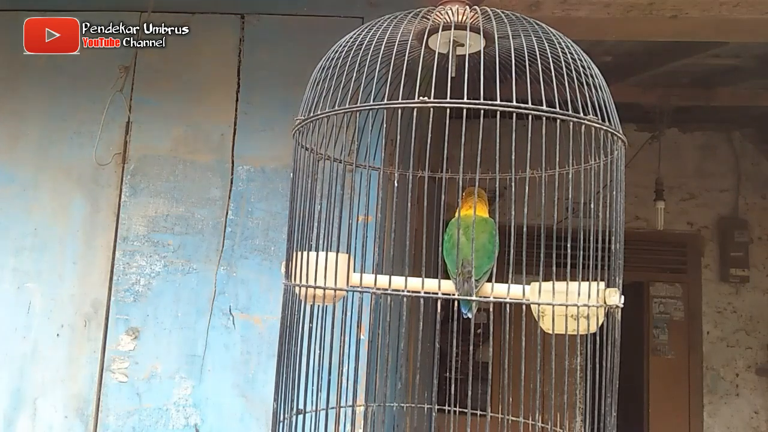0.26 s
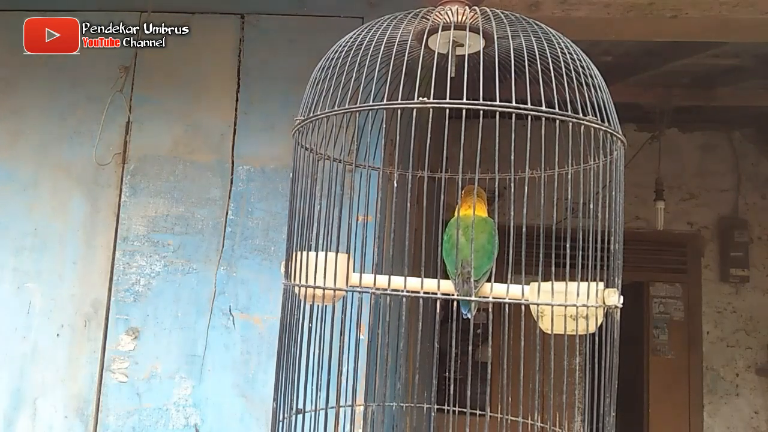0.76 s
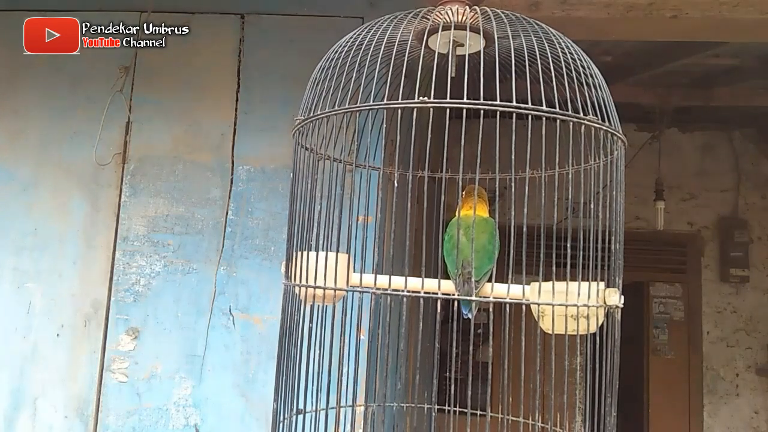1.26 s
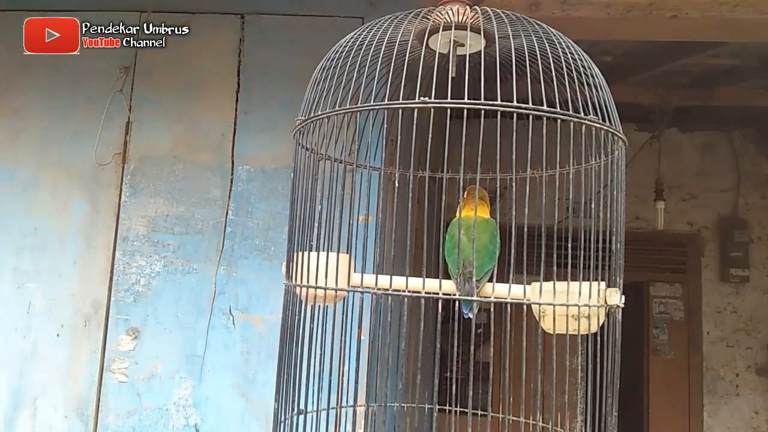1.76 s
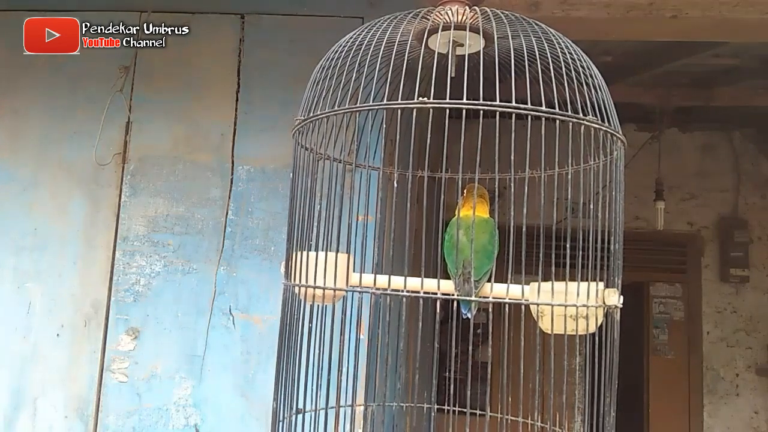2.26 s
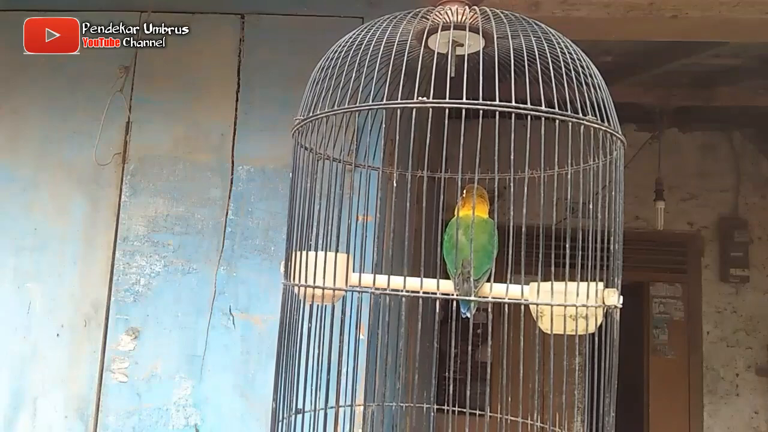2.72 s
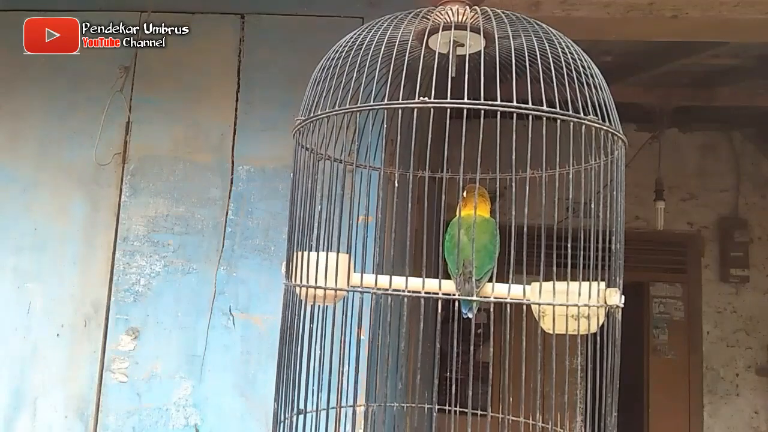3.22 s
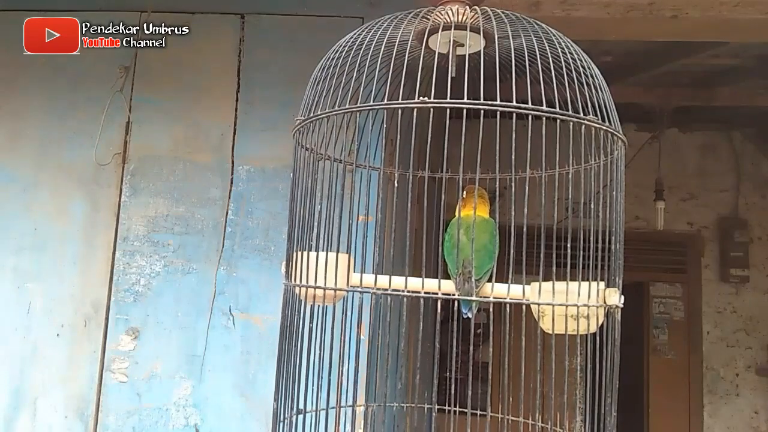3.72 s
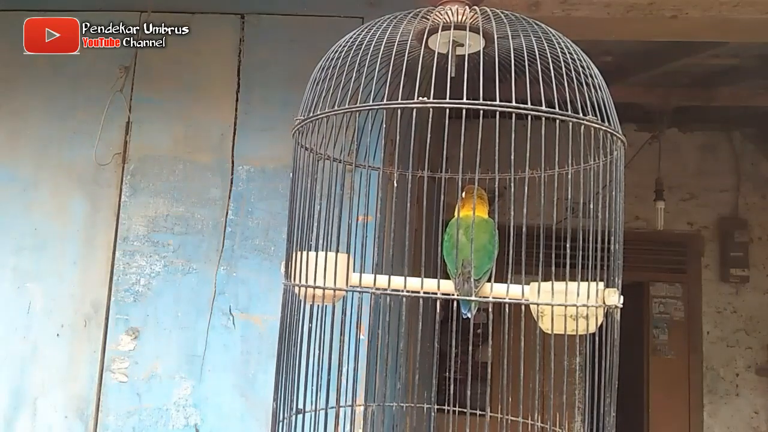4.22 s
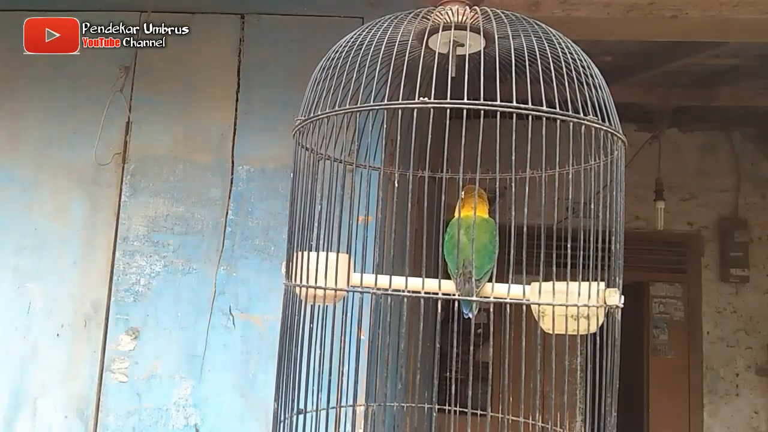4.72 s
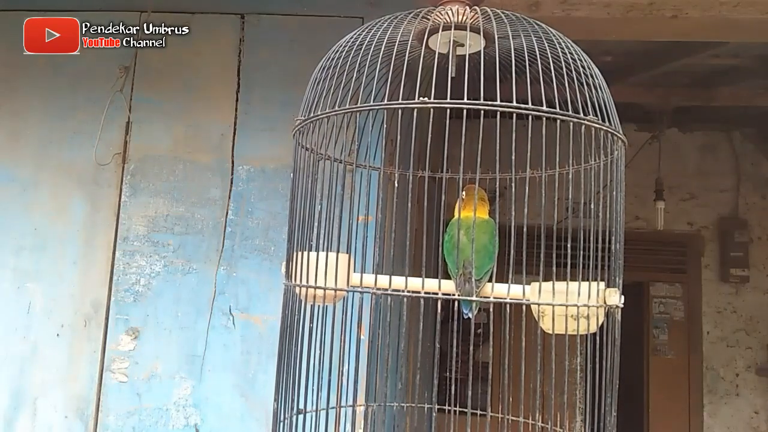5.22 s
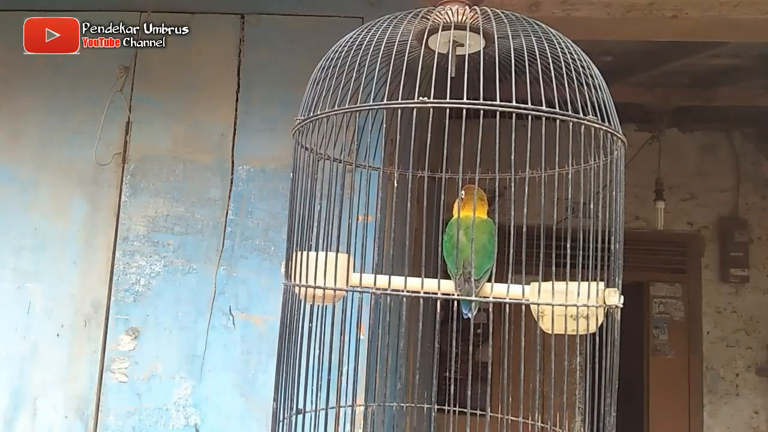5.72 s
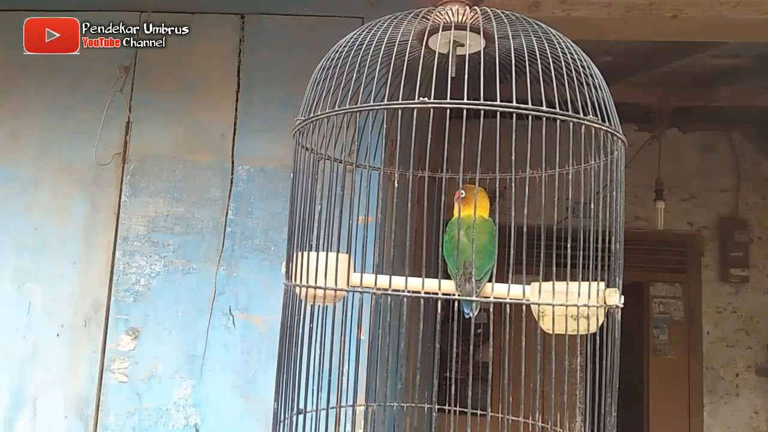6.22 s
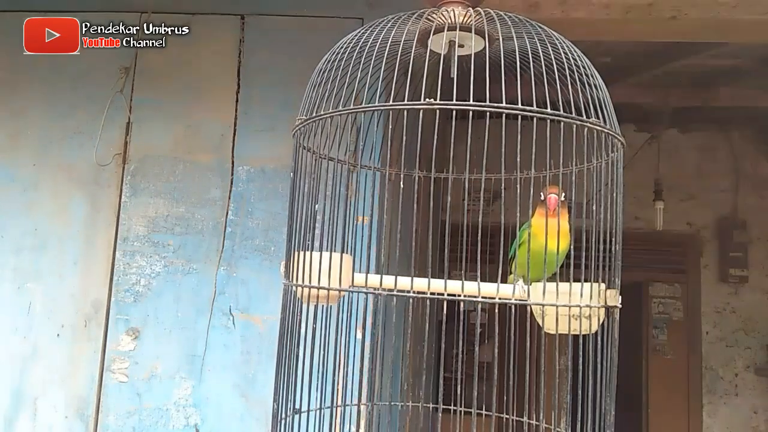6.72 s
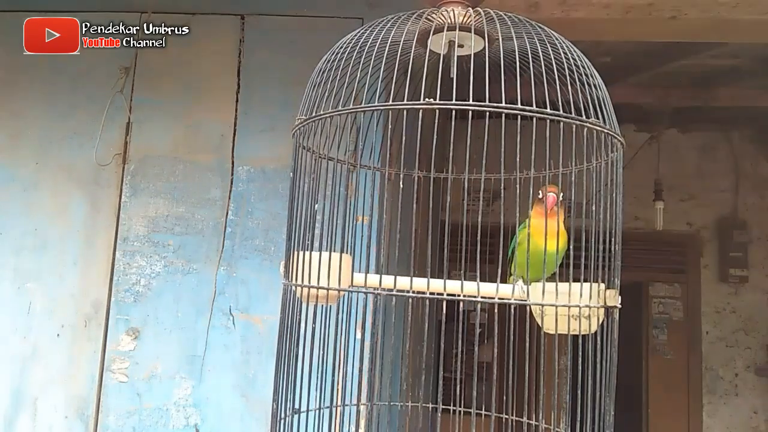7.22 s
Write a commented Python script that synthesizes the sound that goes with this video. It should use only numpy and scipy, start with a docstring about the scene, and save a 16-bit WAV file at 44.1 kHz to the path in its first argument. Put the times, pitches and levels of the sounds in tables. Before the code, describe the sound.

A lovebird close by on an echoing porch sings almost without pause: steady tweets, harsher rasps, short pips, a fast ticking trill, then slurred squeaky notes. Behind it a single-cylinder motorbike falls from a throaty burr to a slow, fading putter, with traffic wash, hiss and a few dull thuds. Near the end the background drops away, and one clear chirp sounds alone.

```python
"""In the street a single-cylinder motorbike, pulses and gas puffs ringing a pipe, drops from high revs
to an idle amid noise for traffic and hiss. On a porch a lovebird in a cage, a gliding tone that shakes and
doubles its period, trills tweets, and under them a thin whistle sinks farther off.
Rasps, pips, thin squeaks, a fast trill of ticks and slurred notes come next, with a few dull thuds, rung
noise, among them. Near the end the firings stop and the background falls away, leaving one last chirp."""
import sys
import numpy as np
from scipy import signal
from scipy.fft import rfft, irfft
from scipy.io import wavfile
from scipy.ndimage import uniform_filter1d

SR = 44100
rng = np.random.default_rng(int(sys.argv[2]) if len(sys.argv) > 2 else 0)


def wrap_up_sound(samples):
    """Save the sound to the file named by the first command line argument, as 16-bit audio."""
    columns = np.atleast_2d(samples).T
    # keep every value between -1 and 1, then stretch to whole-number steps
    tamed = np.clip(columns, -1, 1)
    steps = np.round(tamed * 32767).astype(np.int16)
    wavfile.write(sys.argv[1], SR, steps)


N = 329427
TIME = np.arange(N) / SR


def from_db(db):
    """Decibels to amplitude gain."""
    return 10 ** (np.asarray(db) / 20)


def rms_one(x):
    """Scale to unit power."""
    return x / np.sqrt(np.mean(x ** 2) + 1e-20)


def read(rows, t):
    """Every column of a curve, joined by straight lines, at the times t."""
    s, *columns = np.transpose(rows)
    return [np.interp(t, s, column) for column in columns]


def gain_at(spectrum, hz):
    """Gain of a spectrum, joined on a log-frequency axis."""
    point_hz, point_db = np.transpose(spectrum)
    return from_db(np.interp(np.log(hz + 1e-9), np.log(point_hz), point_db))


def coloured(spectrum):
    """Steady unit-power noise shaped by a spectrum."""
    bins = rfft(rng.standard_normal(N))
    return rms_one(irfft(bins * gain_at(spectrum, np.fft.rfftfreq(N, 1 / SR)), N))


def flutter(size, hz):
    """Random wavering, mostly slower than hz, with unit power."""
    sos = signal.butter(2, hz, fs=SR, output="sos")
    warm_up = SR // 10
    return rms_one(signal.sosfilt(sos, rng.standard_normal(size + warm_up))[-size:])


def resonate(x, modes):
    """Parallel two-pole resonances with alternating signs."""
    out = 0
    for k, (hz, width_hz, db) in enumerate(modes):
        r = np.exp(-np.pi * width_hz / SR)
        poles = [1, -2 * r * np.cos(2 * np.pi * hz / SR), r * r]
        peak = (1 - r * r) / 2  # evens out the gain at resonance
        out = out + (-1) ** k * from_db(db) * peak * signal.lfilter([1, 0, -1], poles, x)
    return out


def add(track, start_s, sound):
    """Mix a sound into a track, dropping whatever falls outside it."""
    at = round(start_s * SR) + np.arange(len(sound))
    inside = (at >= 0) & (at < N)
    track[at[inside]] += sound[inside]


def exhaust(firings, modes, level_db, gas_db, puff_s, uneven_db=2, steady=.002):
    """Each firing is a pressure pulse and a puff of gas that ring the pipe; without them a smooth hum stays."""
    pulses = np.zeros(N)
    pulses[firings] = from_db(uneven_db * rng.standard_normal(len(firings)))
    fade = np.exp(-1 / (puff_s * SR))
    flow = signal.lfilter([1], [1, -fade], pulses) * np.sqrt(1 - fade ** 2) + steady
    gas = from_db(gas_db) * flow * rng.standard_normal(N)
    sound = resonate(pulses + gas, modes)
    # slow levelling, so that the level curve sets the loudness
    power = uniform_filter1d(uniform_filter1d(sound ** 2, size=8000), size=4000)
    return from_db(level_db) * sound / np.sqrt(np.abs(power) + 1e-20)


# Engine speed. Each row: time in seconds, rate in firings per second.
ENGINE_SPEED = [(0, 31), (.6, 29), (1.05, 27), (1.6, 25.3), (2.3, 24.3), (3.2, 24), (3.8, 21), (4.3, 13),
                (4.52, 11.05), (7.47, 11)]
# Pipe resonances: deep thump, silencer, and bark at high revs.
# Each row: centre in Hz, width in Hz, relative level in dB.
THUMP_MODES = [(65, 25, -2), (107, 23.4, 4.5), (140.6, 8.4, 1.5)]
SILENCER_MODES = [(162.2, 6.7, 5), (232.6, 45.4, -8.5), (305, 19, -9.5), (435.3, 18, -13.5),
                  (990, 250, -34)]
BARK_MODES = [(272.9, 13, 0)]
# Thump level, following the engine's load. Each row: time in seconds, level in dB before a trim.
THUMP_CURVE = [(0.0, -30), (0.06, -34.5), (0.37, -34.5), (0.77, -20.5), (1.41, -28), (1.89, -41.5),
               (6.62, -48), (6.66, -57.5), (7.43, -63.5), (7.47, -78)]
# Level of the silencer's ring. Each row: time in seconds, level in dB before a trim.
RING_CURVE = [(0.0, -32), (0.6, -33), (1.27, -37), (1.52, -44), (2.93, -52), (3.2, -50), (3.39, -37),
              (4.2, -49.5), (4.35, -37.5), (5.03, -58), (5.78, -45), (6.76, -60.5), (7.07, -56),
              (7.47, -66.5)]


def motorbike(thump_trim_db=0.5, ring_trim_db=-1.0, bark_trim_db=2.5, bark_db_per_firing=3.04):
    """One cylinder, slowing to an idle; its firings ring the pipe, and the bark sinks with the revs."""
    count_from_s, last_firing_s = 3.8, 6.65
    per_s, = read(ENGINE_SPEED, TIME)
    cycles = np.cumsum(per_s) / SR
    # the count is aligned to a moment in the slowing
    cycles = cycles - np.interp(count_from_s, TIME, cycles)
    firings = np.flatnonzero(np.diff(np.floor(cycles)))
    firings = firings[firings < last_firing_s * SR]
    thump_db, = read(THUMP_CURVE, TIME)
    ring_db, = read(RING_CURVE, TIME)
    bark_db = ring_db + bark_trim_db + bark_db_per_firing * (per_s - per_s[0])
    thump = exhaust(firings, THUMP_MODES, thump_db + thump_trim_db, gas_db=-8, puff_s=0.052)
    ring = exhaust(firings, SILENCER_MODES, ring_db + ring_trim_db, gas_db=4, puff_s=0.18)
    bark = exhaust(firings, BARK_MODES, bark_db, gas_db=-8, puff_s=.05)
    band = signal.butter(2, [55, 2000], "band", fs=SR, output="sos")
    return signal.sosfilt(band, thump + ring + bark)


# Lumpy midrange of the street. Each row: time in seconds, level in dB.
LUMP_CURVE = [(0, -64), (.22, -41), (.45, -52), (.73, -46), (1.1, -47), (1.7, -65.5), (7.47, -92.5)]
# Where the lumps lie: lowest centre in Hz, highest centre in Hz.
LUMP_RANGE = (850, 1600)


def lumps(width_hz=70, patchy_db=5, swell_hz=9, count=9):
    """Narrow bands of midrange noise swell and sink, each on its own."""
    total = np.zeros(N)
    for hz in np.geomspace(*LUMP_RANGE, count):
        band = resonate(rng.standard_normal(N), [(hz, width_hz, 0)])
        total += from_db(patchy_db * flutter(N, swell_hz)) * band
    sos = signal.butter(2, [600, 2200], "band", fs=SR, output="sos")
    level_db, = read(LUMP_CURVE, TIME)
    return from_db(level_db) * rms_one(signal.sosfilt(sos, total))


# Colours of the traffic wash and of the hiss. Each row: frequency in Hz, relative density in dB per Hz.
WASH_SPECTRUM = [(250, 5.5), (450, -4.5), (540, -3), (820, 6), (1100, -3), (1600, -6.5), (2000, -2),
                 (2600, -21), (4000, -25), (8000, -23.5)]
HISS_SPECTRUM = [(1500, -12), (3000, -10), (4500, -10), (5800, -10.5), (8000, 8), (10000, 2), (14000, -5.5),
                 (16000, -21)]
# Their levels. Each row: time in seconds, level in dB before the trim and the final drop.
WASH_CURVE = [(0.0, -49.5), (0.62, -45), (0.99, -48.5), (1.48, -55.5), (2.57, -55), (6.42, -54),
              (6.55, -53)]
HISS_CURVE = [(0.0, -46), (2.06, -50), (2.3, -50.5), (4.89, -59), (5.24, -54), (5.79, -53.5), (6.49, -63),
              (6.6, -76)]


def street(wash_trim_db=1.5, hiss_trim_db=-1.0, waver_db=2.3):
    """Shaped noise: a wavering wash of traffic, lumpy at first, and a thin hiss; wash and hiss drop late."""
    hush_at_s, hush_fade_s, wash_drop_db, hiss_drop_db = 6.65, 0.078, 21, 24
    hush = np.clip((TIME - hush_at_s) / hush_fade_s, 0, 1)
    wash_db = read(WASH_CURVE, TIME)[0] + wash_trim_db - wash_drop_db * hush
    hiss_db = read(HISS_CURVE, TIME)[0] + hiss_trim_db - hiss_drop_db * hush
    wash = from_db(wash_db + waver_db * flutter(N, 14)) * coloured(WASH_SPECTRUM)
    hiss = from_db(hiss_db) * coloured(HISS_SPECTRUM)
    return wash + lumps() + hiss


# Windpipe and open beak as a filter. Each row: frequency in Hz, gain in dB.
THROAT_GAIN = [(1500, 23), (2500, -16.5), (3500, 3.5), (4800, -6), (6000, 1), (7500, -5.5), (9000, -5.5),
               (11000, 1), (13000, 1), (15000, -36.5)]


def syllable(t, shape, pitch, overtone_db, slope_db=-5):
    """The syrinx glides one tone; pressed hard it shakes and doubles its period, adding half-pitch tones.

    Doubling 0 is pure, 1 has the half-pitch tones in full, above 1 the half pitch leads.
    """
    jitter, shake_hz, shimmer_db, smear_rad = .06, 700, 3.5, .8  # depths at full roughness
    hz, level_db, rough, doubling = read(shape, t)
    hz = pitch * hz * (1 + jitter * rough * flutter(len(t), shake_hz))
    phase = 2 * np.pi * np.cumsum(hz) / SR
    tone, power = 0, 0
    for half in range(1, 9):
        k = half / 2  # multiple of the pitch
        source_db = overtone_db * (half > 3) + slope_db * max(k - 2, 0)
        if half % 2 == 0:
            share = 1
        elif half == 1:
            share = doubling ** 2
        else:
            share = np.minimum(doubling, 1) ** 2
        weight = from_db(source_db) * gain_at(THROAT_GAIN, k * hz) * share * (k * hz < SR / 2)
        # chaotic vibration breaks each partial up on its own, the high ones most
        partial = np.sin(k * (phase + smear_rad * rough * flutter(len(t), shake_hz)))
        shimmer = from_db(shimmer_db * rough * (flutter(len(t), shake_hz) - rough / 2))
        tone = tone + weight * partial * shimmer
        power = power + weight ** 2 / 2
    return from_db(level_db) * tone / np.sqrt(power + 1e-12) * signal.windows.tukey(len(t), .05)


def phrase(shape, notes, overtone_db, stretch=1, longer_per_db=0):
    """One syllable repeated, each note with its own strength and pitch; strength may alter its length."""
    out = np.zeros(N)
    first, last = shape[0][0], shape[-1][0]
    mean_db = np.mean([note[1] for note in notes])
    for s, db, pitch in notes:
        length = stretch * np.exp(longer_per_db * (db - mean_db))
        t = np.arange(first, last, 1 / (SR * length))  # time within the unstretched shape
        add(out, s + first * length, from_db(db) * syllable(t, shape, pitch, overtone_db))
    return out


def plain(notes):
    """Notes at their shape's own pitch."""
    return [(s, db, 1) for s, db in notes]


def trill(first_s, gap_s, slowing_s, effort, count, uneven_db, stray):
    """Notes on a beat whose gap grows by slowing_s each time; level and pitch follow the effort, unevenly."""
    k = np.arange(count)
    s = first_s + k * gap_s + slowing_s * k * (k - 1) / 2
    db, pitch = read(effort, s)
    chance = rng.uniform(-1, 1, (count, 2))
    return np.transpose([s, db + uneven_db * chance[:, 0], pitch * (1 + stray * chance[:, 1])])


# Shape of a tweet, before the note's pitch, level and stretch, as for all syllables below.
# Each row: seconds from onset, pitch in Hz, level in dB, roughness 0-1, period doubling.
TWEET_SHAPE = [(-.016, 3900, -20, .2, 6), (-.008, 4700, -6, .35, 6), (-.003, 5800, -2, .35, 6),
               (-.001, 4400, -4, .42, .25), (.004, 4300, -1, .54, .1), (.011, 3980, 1, .5, .1),
               (.019, 3670, 2, .33, 0), (.036, 3620, 1.5, .22, 0), (.043, 3610, -16, .2, 0)]
# Effort over the trill. Each row: time in seconds, level in dB, pitch factor.
TWEET_CURVE = [(0, -31, 1), (.25, -31.5, 0.97), (.65, -30, 0.99), (1.0, -30, 1.014), (1.45, -31, .995),
               (1.75, -32.5, 0.97)]


def tweets():
    """A slowing trill of syrinx tones; stronger notes are held longer."""
    notes = trill(first_s=.0135, gap_s=.1212, slowing_s=.00036, effort=TWEET_CURVE,
                  count=15, uneven_db=.4, stray=.008)
    return phrase(TWEET_SHAPE, notes, overtone_db=-5.5, stretch=1.01, longer_per_db=0.11)


# Each row: seconds from onset, pitch in Hz, level in dB, roughness 0-1, period doubling.
WHISTLE_SHAPE = [(-.006, 2650, -25.5, 0.036, 0.0047), (.004, 2620, 9.5, 0.03, 0.015),
                 (.022, 2260, 6, .1, 0), (.036, 2240, -17.5, .1, 0.0073)]
# Each row: start in seconds, level in dB, pitch factor.
WHISTLE_NOTES = [(0.209, -45.5, 0.96), (0.353, -44, 0.93), (0.43, -46.5, 0.93), (0.634, -45, 0.9),
                 (.725, -43.5, 0.89)]


def whistles():
    """A thin, sinking whistle farther off: the same tone model with weak overtones."""
    return phrase(WHISTLE_SHAPE, WHISTLE_NOTES, overtone_db=-38, stretch=1.15)


# Dull blows in the street. Each row: start in seconds, level in dB.
THUD_BLOWS = [(1.842, -34), (1.879, -35), (3.212, -32), (3.249, -35), (3.286, -40.5), (4.242, -40),
              (4.382, -37.5)]
# Their hollow body. Each row: centre in Hz, width in Hz, relative level in dB.
THUD_MODES = [(157, 15.7, 8.5), (266, 79, -3.5), (350, 17, -5), (450, 45, -12)]


def thuds(t60_s=0.44):
    """Soft blows: decaying noise rings something hollow, drawn out by the street's echo."""
    out, t = np.zeros(N), TIME[:SR // 2]
    for s, db in THUD_BLOWS:
        boom = resonate(rng.standard_normal(len(t)) * from_db(-60 * t / t60_s), THUD_MODES)
        add(out, s, from_db(db) * boom / np.std(boom[:SR // 20]))
    return signal.sosfilt(signal.butter(2, 600, fs=SR, output="sos"), out)


# Each row: seconds from onset, pitch in Hz, level in dB, roughness 0-1, period doubling.
RASP_SHAPE = [(-.010, 4050, -17, .1, .9), (-.003, 4000, -11, .25, .9), (0, 5900, 2, .75, 1),
              (.006, 5100, 3, .62, .9), (.014, 4830, 1.5, .5, .85), (.023, 4780, 0, .45, .85),
              (.031, 4850, -14, .5, .8)]
# Each row: start in seconds, level in dB, pitch factor.
RASP_NOTES = [(1.862, -29, 1.05), (1.968, -29.5, 0.98), (2.082, -27.5, 1), (2.2, -27.5, 1),
              (2.31, -26.5, 1.05), (2.415, -28, 1.005), (2.534, -26, 1.03), (2.656, -28, 1.016),
              (2.782, -28.5, 1.1), (2.906, -28.5, 1.1)]


def rasps():
    """Rough notes whose strong period doubling fills in half-pitch tones."""
    return phrase(RASP_SHAPE, RASP_NOTES, overtone_db=-11.5, stretch=1.16)


# Each row: seconds from onset, pitch in Hz, level in dB, roughness 0-1, period doubling.
PIP_SHAPE = [(-.001, 4840, -38, 0.79, .9), (.002, 4996, 7, 0.14, 0.99), (.006, 5403, 1, 0.074, 0.96),
             (.012, 5300, -2, .15, .7), (.016, 5100, -57, .2, .7)]
# Each row: start in seconds, level in dB, pitch factor.
PIP_NOTES = [(3.022, -30.5, 1.073), (3.108, -31.5, 1), (3.203, -34, 1.005), (3.296, -39.5, 0.94),
             (3.377, -38.5, 0.98), (3.452, -37.5, .9), (3.528, -33, 1.01)]


def pips():
    """Very short period-doubled tones; stronger ones are slightly shorter."""
    return phrase(PIP_SHAPE, PIP_NOTES, overtone_db=-14.5, stretch=.87, longer_per_db=-0.0091)


# Each row: seconds from onset, pitch in Hz, level in dB, roughness 0-1, period doubling.
SQUEAK_SHAPE = [(-.003, 8940, -18, 0.42, 0.0043), (0, 10650, 8.5, 0.53, 0), (.002, 11000, -17, .3, 0),
                (.005, 8600, 9, 0.5, 0.016)]
# Each row: start in seconds, level in dB.
SQUEAK_NOTES = [(3.22, -43), (3.256, -42), (3.292, -39.5), (4.242, -44), (4.454, -48)]


def squeaks():
    """Thin, very high tones among the pips and ticks, nearly bare of overtones."""
    return phrase(SQUEAK_SHAPE, plain(SQUEAK_NOTES), overtone_db=-31)


# Each row: seconds from onset, pitch in Hz, level in dB, roughness 0-1, period doubling.
TICK_SHAPE = [(-.056, 4150, -26, .3, 5), (-.042, 4100, -14, .3, 5), (-.020, 4000, -32, .3, 5),
              (-.002, 4200, -32, .6, 2), (0, 6100, 5.5, .7, .8), (.003, 5900, 3.5, .65, .6),
              (.004, 4000, -3, .7, .3), (.008, 4400, -4, .5, .2), (.012, 4400, -20, .4, .2)]
# Effort over the fast trill. Each row: time in seconds, level in dB, pitch factor.
TICK_CURVE = [(3.66, -34.5, 0.98), (3.82, -41.5, 1.03), (4.11, -40.5, 0.98), (4.39, -33, 1.01),
              (4.5, -36.5, .98), (4.87, -40, 0.97)]
# The strong tick that closes it: start in seconds, level in dB, pitch factor.
LAST_TICK = (4.982, -29.5, 0.95)


def ticks():
    """A fast, slowing trill of rough, short bursts of tone, closed by a strong tick."""
    notes = trill(first_s=3.603, gap_s=.0714, slowing_s=.00051, effort=TICK_CURVE,
                  count=18, uneven_db=1.2, stray=.04)
    return phrase(TICK_SHAPE, [*notes, LAST_TICK], overtone_db=-11, stretch=.9)


# Each row: seconds from onset, pitch in Hz, level in dB, roughness 0-1, period doubling.
DIP_SHAPE = [(-.002, 7240, -10, .5, 1.3), (.003, 6480, 1.5, 0.65, 1.3), (.011, 4990, 1, 0.7, 0.98),
             (.02, 4410, -1, .45, .6), (.034, 4550, -1, .45, .6), (.039, 4650, -20, .4, .6)]
# Each row: start in seconds, level in dB.
DIP_NOTES = [(5.075, -29)]


def dips():
    """A falling, half-doubled tone that leads from the ticks into the slurred notes."""
    return phrase(DIP_SHAPE, plain(DIP_NOTES), overtone_db=-6.5)


# Each row: seconds from onset, pitch in Hz, level in dB, roughness 0-1, period doubling.
CHEW_SHAPE = [(-.002, 5290, -14.5, 0.15, 0.12), (.002, 5023, -2, 0.66, 0.18), (.009, 4364, -5, 0.81, 0.55),
              (.015, 4320, -0.5, 0.31, 0.51), (.023, 4750, -2.5, .3, 0.87), (.031, 5510, -2.5, 0.15, 0.96),
              (.039, 5500, -2.5, 0.41, 0.7)]
# Each row: start in seconds, level in dB, pitch factor.
CHEW_NOTES = [(5.174, -22.5, 1.004), (5.281, -23.5, 1.06)]


def chews():
    """Tones that fall and rise again while their period doubling grows."""
    return phrase(CHEW_SHAPE, CHEW_NOTES, overtone_db=-11.5)


# Each row: seconds from onset, pitch in Hz, level in dB, roughness 0-1, period doubling.
SLIDE_SHAPE = [(-.009, 3860, -6, .05, 0.047), (.002, 3546, 1.5, .08, 0.0078),
               (.012, 3285, -0.5, .15, 0.022), (.025, 2830, 5, .5, 0), (.029, 4850, -4, .3, .1),
               (.042, 4650, 9.5, .08, 0), (.048, 4200, -9, .1, 0.011)]
# Each row: start in seconds, level in dB.
SLIDE_NOTES = [(5.409, -29.5)]


def slides():
    """A nearly pure tone that slides down, then leaps up."""
    return phrase(SLIDE_SHAPE, plain(SLIDE_NOTES), overtone_db=-3, stretch=.87)


# Each row: seconds from onset, pitch in Hz, level in dB, roughness 0-1, period doubling.
SLUR_SHAPE = [(-.022, 1584, -21, 0.045, 0.0091), (-.015, 1847, -11, .1, 0.014),
              (-.008, 3055, -7.5, 0.24, 0.02), (.002, 3594, 4.5, 0.055, 0.015),
              (.013, 3240, -4, 0.66, 0.0067), (.017, 5860, 5, 0.58, .1), (.023, 4750, -4, .15, 0),
              (.030, 4553, 9.5, 0.06, 0.028), (.036, 4630, -5, .1, 0.016)]
# Each row: start in seconds, level in dB.
SLUR_NOTES = [(5.538, -29.5), (5.66, -29.5), (5.781, -30), (5.903, -28.5)]


def slurs():
    """Tones that sweep up from a low start, with a rough leap on the way."""
    return phrase(SLUR_SHAPE, plain(SLUR_NOTES), overtone_db=-8.0, stretch=0.99)


# Each row: seconds from onset, pitch in Hz, level in dB, roughness 0-1, period doubling.
WARBLE_SHAPE = [(-.033, 3170, -24, 0.12, 0), (-.018, 2865, 1, .05, 0.042), (-.011, 2264, -8, 0.13, 0.023),
                (-.005, 4050, -1.5, 0.37, 0), (.005, 3420, 1.5, 0.24, 0), (.011, 4730, -11, 0.27, 0.88),
                (.017, 4700, 4.5, .8, 1), (.023, 4010, -5, 0.54, 0), (.033, 4780, 3.5, 0.29, 0.53),
                (.039, 4320, -28, 0.66, 0.43)]
# Each row: start in seconds, level in dB.
WARBLE_NOTES = [(6.086, -30.5)]


def warbles():
    """A tone whose pitch swings up and down, doubling its period in places."""
    return phrase(WARBLE_SHAPE, plain(WARBLE_NOTES), overtone_db=-11.5)


# Each row: seconds from onset, pitch in Hz, level in dB, roughness 0-1, period doubling.
CHIRP_SHAPE = [(-.009, 4800, -24, 1, 2), (-.001, 4700, -17, 1, 1), (0, 5700, 1, .15, 0),
               (.002, 5750, 3, .1, 0), (.004, 4200, -1, .2, 0), (.006, 4700, 3, .25, 0),
               (.013, 4850, 3, .25, 0), (.016, 5000, -2, .25, 0), (.024, 4850, -5, .25, 0),
               (.028, 4050, -13, .2, 0), (.034, 4000, -25, .2, 0)]
# Each row: start in seconds, level in dB.
CHIRP_NOTES = [(7.1272, -25)]


def chirps():
    """The last note: a sharp, high start, then a mostly clear tone."""
    return phrase(CHIRP_SHAPE, plain(CHIRP_NOTES), overtone_db=-5, stretch=.91)


def lovebird():
    """The whole song, every syllable from the same syrinx and throat."""
    opening = tweets() + rasps() + pips()
    fast = squeaks() + ticks() + dips()
    slurred = chews() + slides() + slurs() + warbles()
    return opening + fast + slurred + chirps()


# Nearby walls. Each row: delay in seconds, level in dB.
WALL_ECHOES = [(.0047, -8), (.0112, -10.5)]


def porch(x, tail_db, build_s=.004, dull_hz=9000, t60_s=.42):
    """A few wall echoes and a diffuse decaying tail, both with some treble lost."""
    t = TIME[:SR // 2]
    tail = rng.standard_normal(len(t)) * from_db(-60 * t / t60_s) * (1 - np.exp(-t / build_s))
    response = from_db(tail_db) * tail / np.sqrt(np.sum(tail ** 2))
    for delay_s, db in WALL_ECHOES:
        add(response, delay_s, from_db([db]))
    response = signal.sosfilt(signal.butter(1, dull_hz, fs=SR, output="sos"), response)
    return signal.fftconvolve(x, response)[:N]


def scene():
    """The bird on its porch, and the street beyond."""
    background = motorbike() + street() + thuds()
    near, far = lovebird(), whistles()
    bird = near + porch(near, tail_db=-9.5)
    whistle = far + porch(far, tail_db=-2.5)  # farther off, so more of the tail
    return (background + bird + whistle)[None]


def record(dry):
    """A steep low-pass cuts the top."""
    cutoff_hz = 14350
    return signal.sosfilt(signal.ellip(10, .2, 70, cutoff_hz, fs=SR, output="sos"), dry)


dry = scene()
out = record(dry)
wrap_up_sound(out)
```